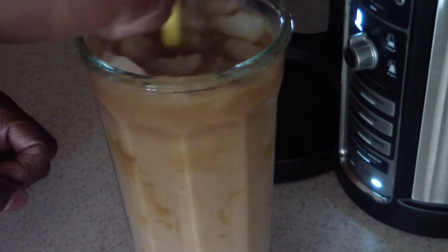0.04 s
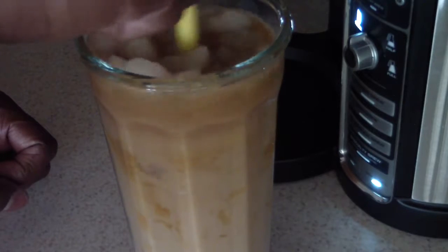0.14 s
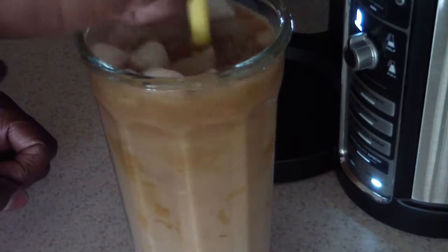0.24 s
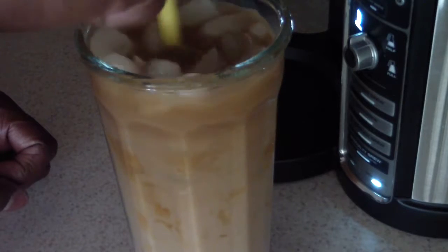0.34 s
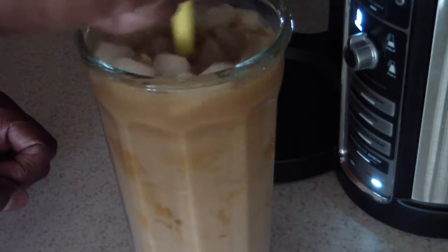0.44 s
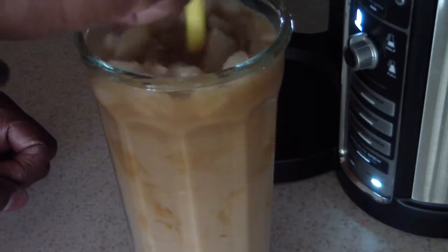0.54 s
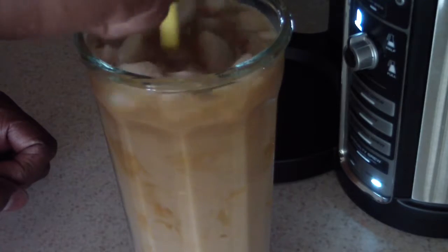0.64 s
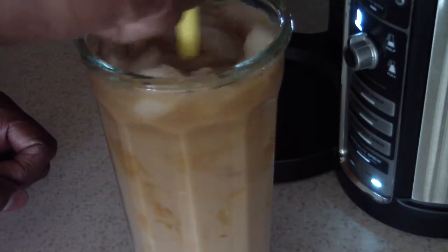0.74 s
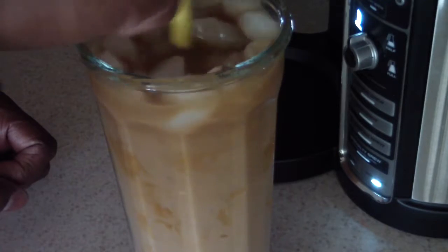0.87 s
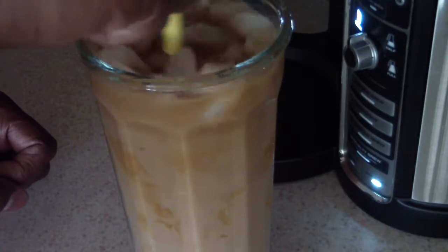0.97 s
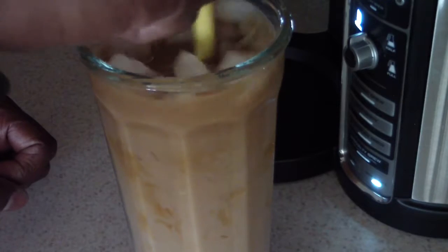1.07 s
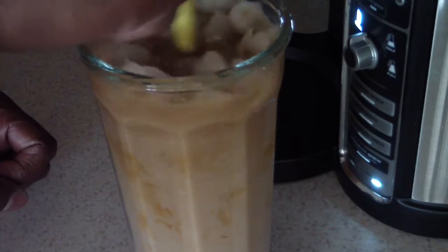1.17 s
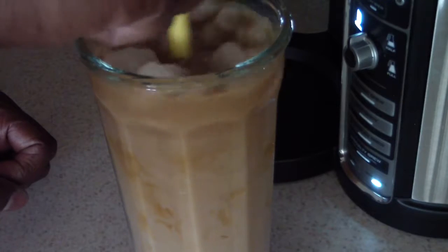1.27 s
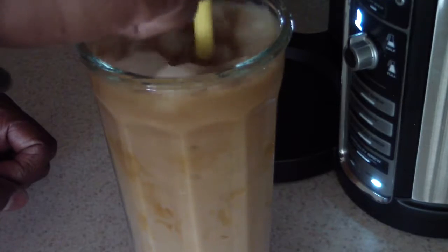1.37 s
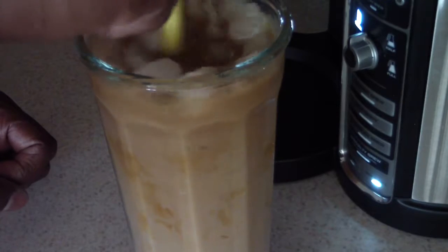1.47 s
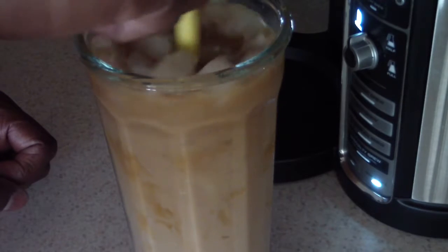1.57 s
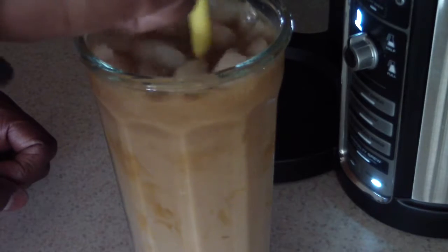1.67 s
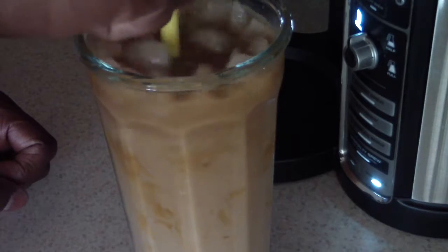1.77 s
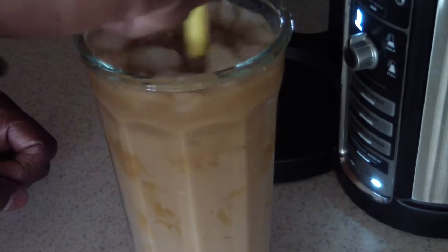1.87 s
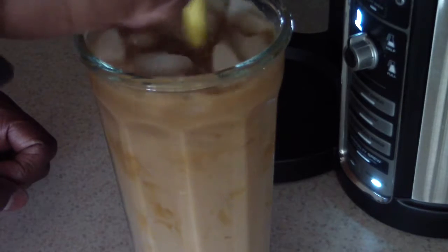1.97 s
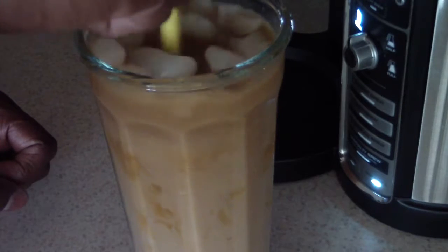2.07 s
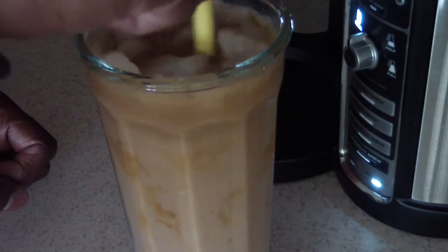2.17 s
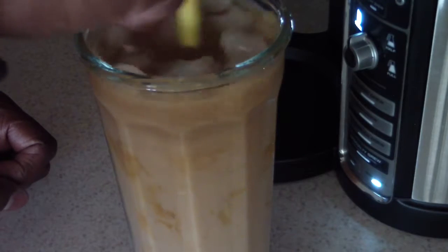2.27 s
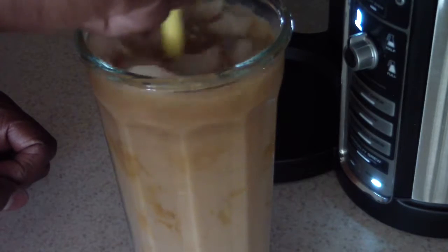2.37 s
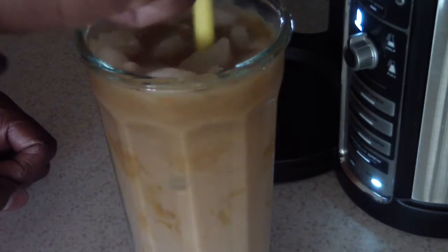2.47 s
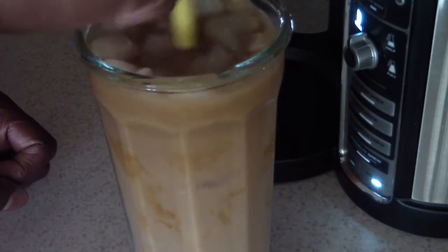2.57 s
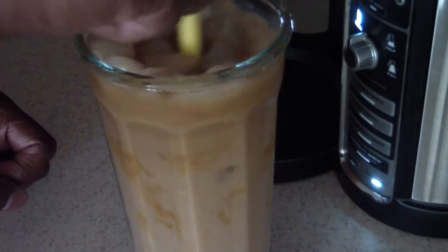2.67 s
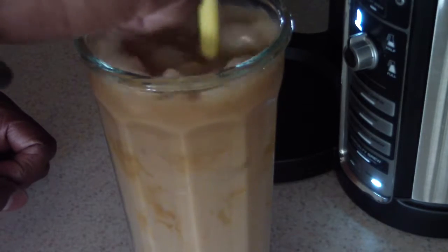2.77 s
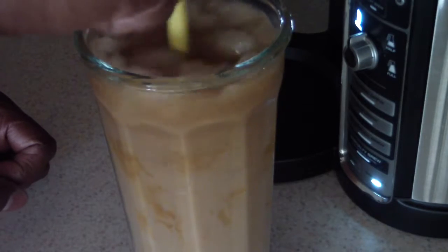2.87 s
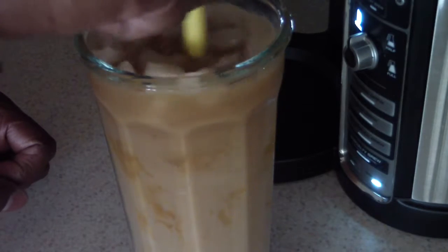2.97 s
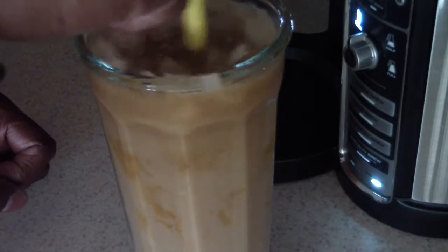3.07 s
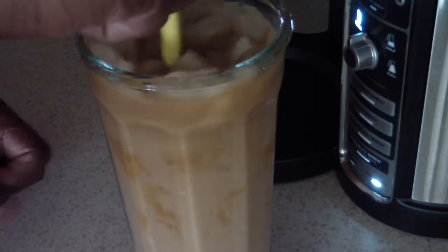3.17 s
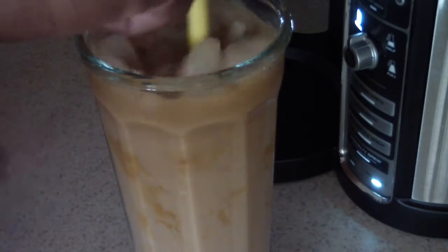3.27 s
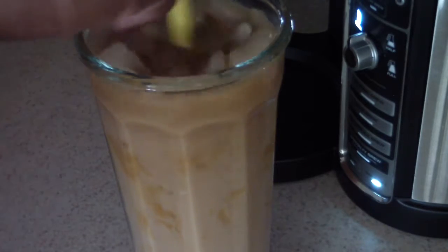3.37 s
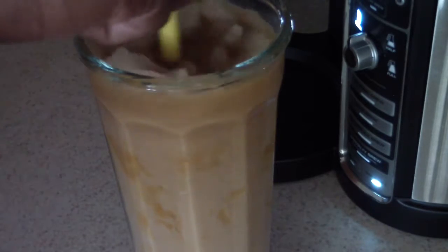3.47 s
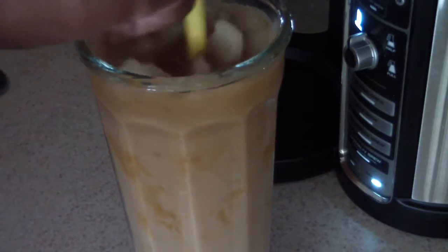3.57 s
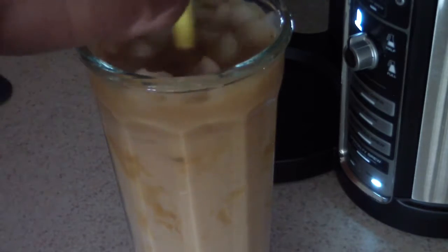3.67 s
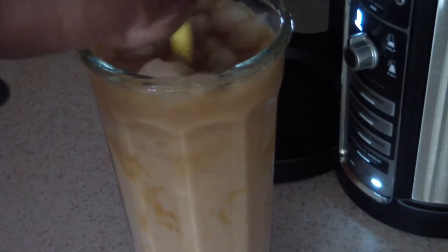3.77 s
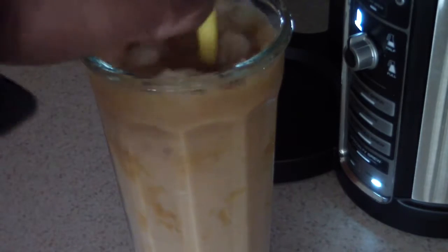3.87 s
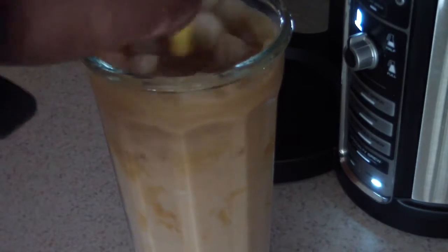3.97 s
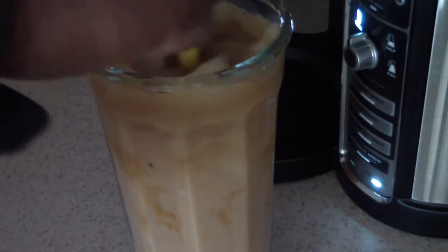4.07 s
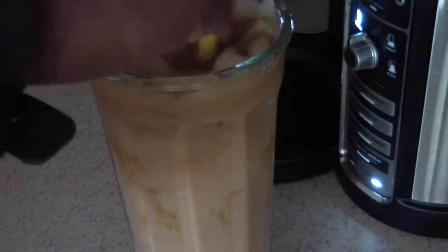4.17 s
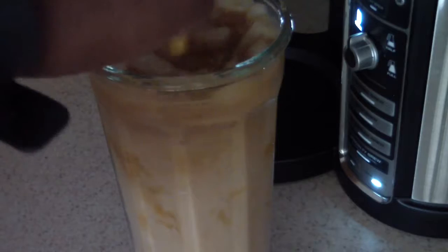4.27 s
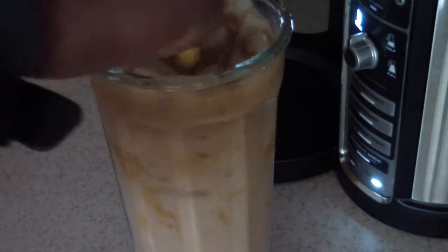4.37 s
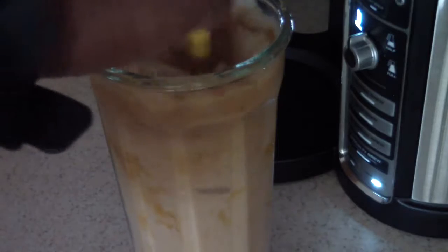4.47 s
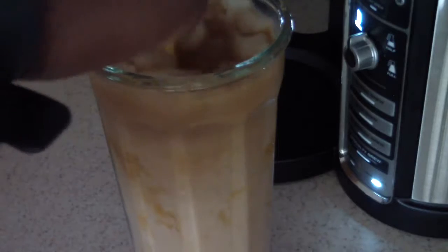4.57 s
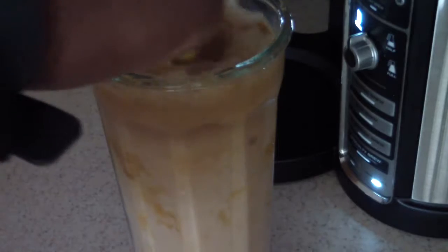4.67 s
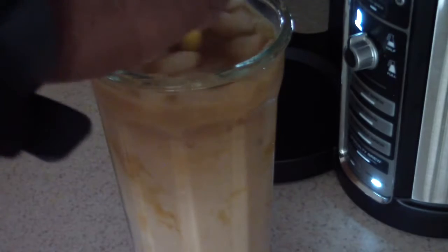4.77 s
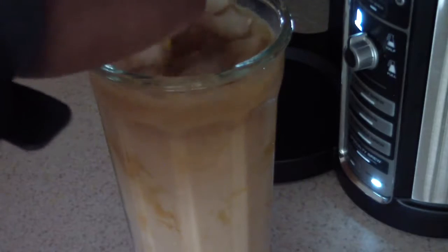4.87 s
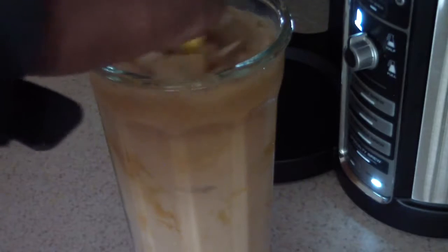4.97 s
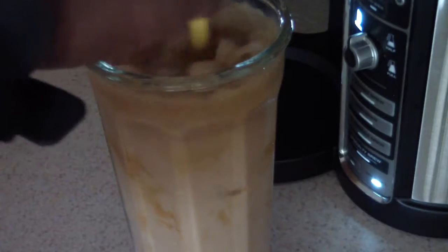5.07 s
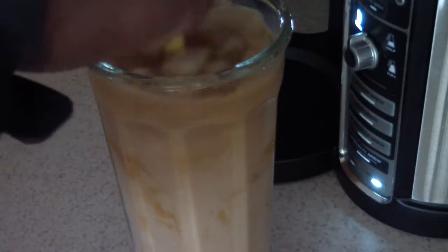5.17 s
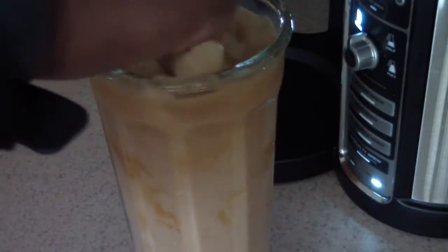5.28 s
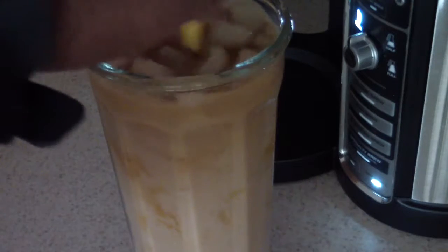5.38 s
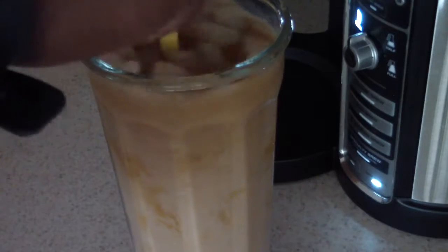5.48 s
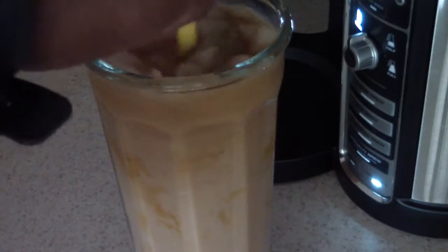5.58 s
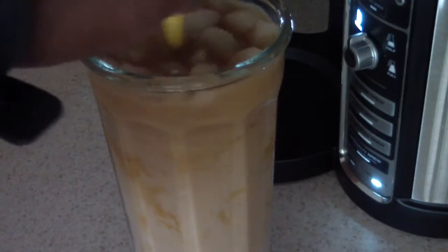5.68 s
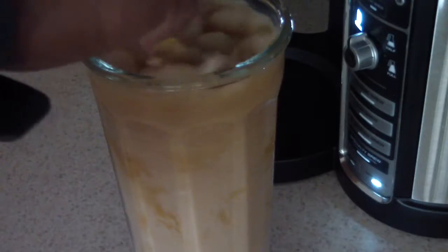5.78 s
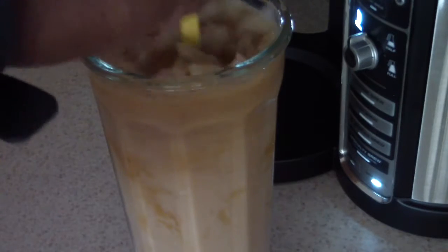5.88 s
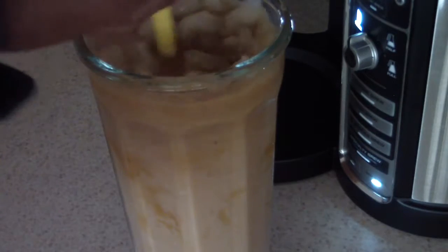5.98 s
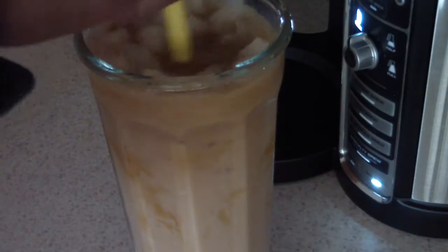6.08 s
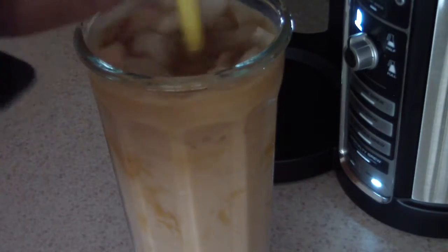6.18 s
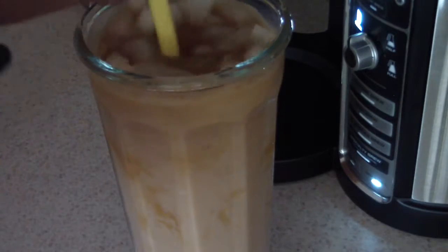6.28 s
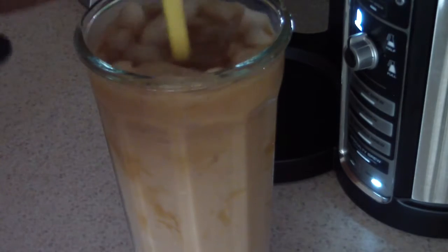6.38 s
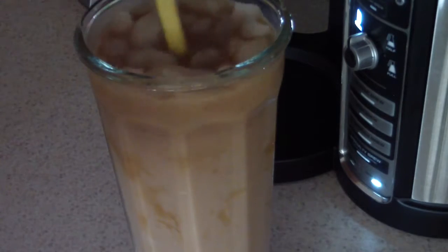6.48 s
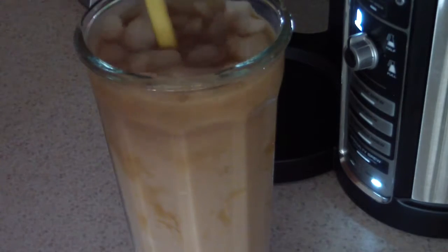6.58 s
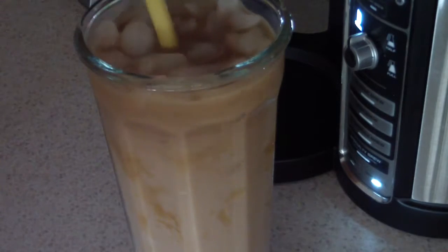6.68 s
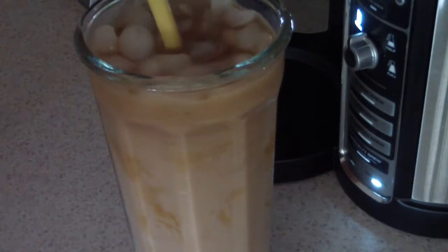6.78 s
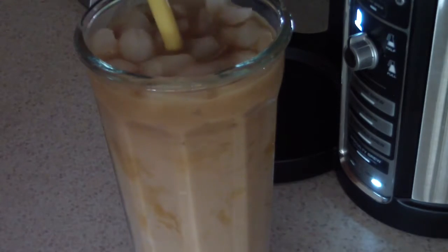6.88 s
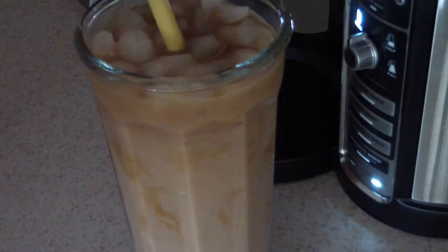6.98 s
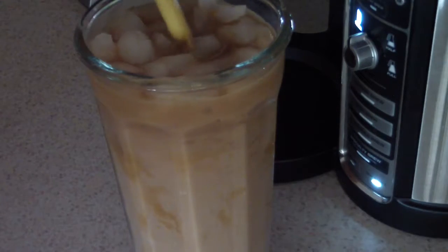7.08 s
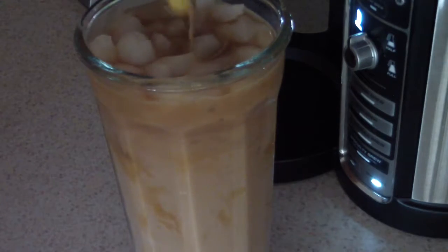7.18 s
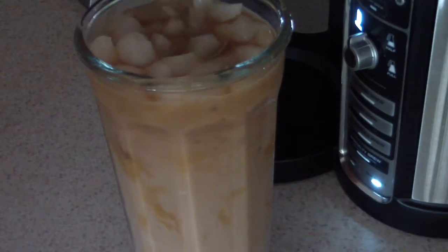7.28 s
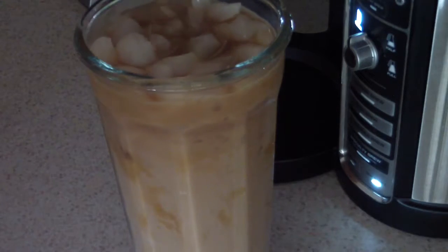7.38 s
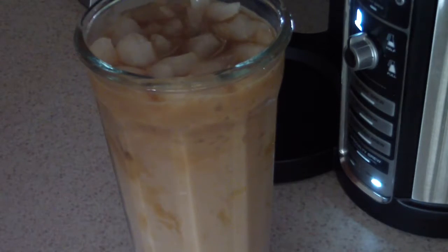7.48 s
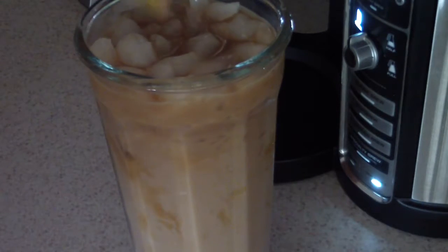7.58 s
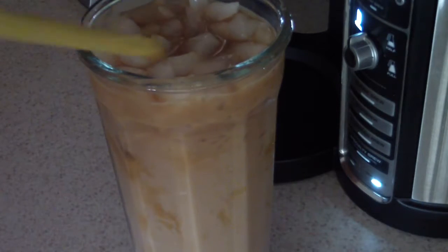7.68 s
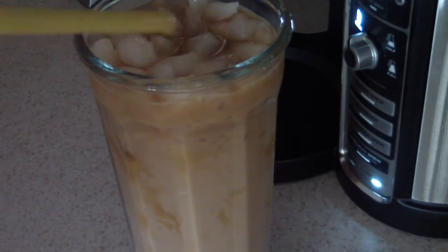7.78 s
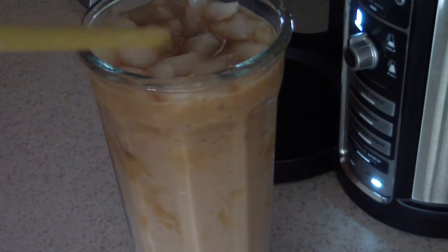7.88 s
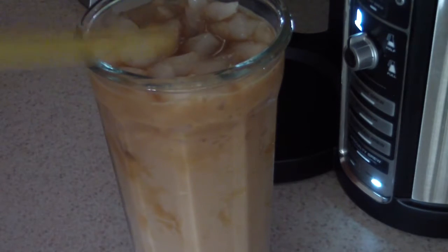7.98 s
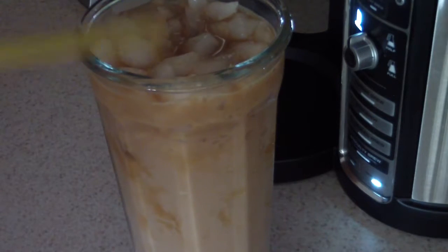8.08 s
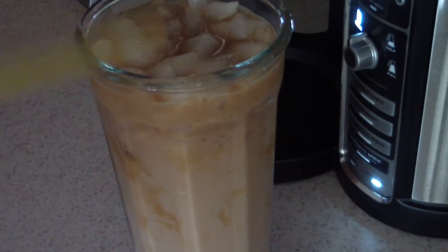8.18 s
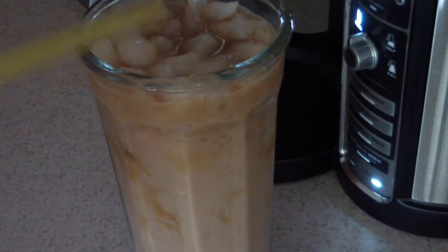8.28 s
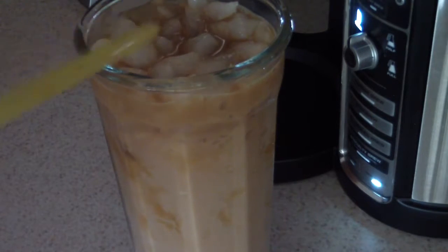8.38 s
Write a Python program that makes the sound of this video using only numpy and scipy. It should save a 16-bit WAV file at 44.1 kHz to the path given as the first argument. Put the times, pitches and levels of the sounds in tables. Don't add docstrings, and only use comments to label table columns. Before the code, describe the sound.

Fast, bright ice clatter in a full glass with wet gurgles and soft base thuds, ending in quiet ticks and a few light rim taps.

```python
import sys
import numpy as np
from scipy import signal
from scipy.fft import rfft, irfft
from scipy.io import wavfile

SR = 44100
rng = np.random.default_rng(int(sys.argv[2]) if len(sys.argv) > 2 else 0)


def attenuation_scalar(level_db):
    decades = np.asarray(level_db, float) / 20
    return 10 ** decades


def transcribe(signal):
    frames = np.atleast_2d(signal).T
    limited = np.clip(frames, -1, 1)
    pcm = np.round(limited * 32767).astype(np.int16)
    wavfile.write(sys.argv[1], SR, pcm)


N = 372204


def rms_one(x):
    return x / np.sqrt(np.mean(x ** 2) + 1e-20)


def at_hz(points, hz):
    table_hz, table_db = np.transpose(points)
    return np.interp(np.log(hz), np.log(table_hz + 1), table_db)


def colour(x, points):
    hz = np.arange(N // 2 + 1) * SR / N + 1
    return irfft(rfft(x) * attenuation_scalar(at_hz(points, hz)), N)


def drift(rate_hz):
    r = np.exp(-2 * np.pi * rate_hz / SR)
    noise = rng.standard_normal(N + SR)
    return rms_one(signal.lfilter([1], [1, -2 * r, r * r], noise)[SR:])


def ring(clicks, hz, t60):
    r, w = attenuation_scalar(-60 / (t60 * SR)), 2 * np.pi * hz / SR
    return signal.lfilter([0, np.sin(w)], [1, -2 * r * np.cos(w), r * r], clicks + 1e-18)


def sine(hz, t):
    return np.sin(2 * np.pi * hz * t)


def decay(t, t60):
    return attenuation_scalar(-60 * t / t60)


def swell(t, rise_s):
    return 1 - np.exp(-t / rise_s)


def filtered(x, order, hz, kind):
    return signal.sosfilt(signal.butter(order, hz, kind, fs=SR, output="sos"), x)


def add(out, s, sound):
    i = round(s * SR)
    out[i:i + len(sound)] += sound[:N - i]


# (start [s], length [s], strength [dB], brightness [dB])
PUSHES = [(-.03, 0.023, -1.5, 4), (0.082, 0.14, -3, 2), (0.28, 0.2, 1, 3), (0.528, 0.18, -1, 5.5),
          (0.804, .13, 0, 3), (0.985, 0.049, 1, 5.5), (1.136, 0.17, -1.5, -1), (1.471, 0.091, 3.5, 3),
          (1.705, 0.17, -2.5, 4), (1.941, 0.2, 2, 1), (2.223, 0.17, -1, 4.5), (2.483, 0.082, -6.5, 10),
          (2.612, 0.11, 2.5, 2), (2.819, 0.15, 0.5, 5), (3.109, 0.17, 1, 4.5), (3.396, 0.063, 3.5, 5.5),
          (3.595, 0.052, -10, 11), (3.72, 0.052, 3, 5), (3.941, 0.14, 1.5, 5.5), (4.169, 0.25, 0, 2.5),
          (4.483, 0.18, 0.5, 3), (4.745, 0.092, 1.5, -3), (4.9, 0.074, 7, 0.5), (5.044, 0.25, 2.5, -2.5),
          (5.358, 0.14, -0.7, 3.5), (5.723, 0.069, 5.5, 4.5), (5.864, 0.16, -2.5, 4),
          (6.144, 0.19, -1.5, 2), (6.409, 0.02, -1.5, -3), (6.532, 0.031, -12, -20)]


def stir():
    attack_s, release_db_per_s, settle_db_per_s = 0.028, 169, 110
    drift_db, stop_s = -4.5, 6.36
    trickle_db, trickle_end_s = -27, 6.95
    pause_s, pause_length_s, pause_db, pause_edge_s = 5.528, 0.12, -4, 0.0091
    t = np.arange(0, N, 32) / SR
    start, length, db, bright_db = np.transpose(PUSHES)[:, :, None]
    onset = np.clip((t - start) / attack_s + .5, 0, 1)
    release_db = release_db_per_s * np.maximum(t - start - length, 0)
    pushes = (onset * attenuation_scalar(db - release_db)) ** 2
    rest = attenuation_scalar(drift_db - settle_db_per_s * np.maximum(t - stop_s, 0)) ** 2
    rest += attenuation_scalar(trickle_db - settle_db_per_s * np.maximum(t - trickle_end_s, 0)) ** 2 + 1e-12
    power = pushes.sum(axis=0) + rest
    from_middle = abs(t - pause_s - pause_length_s / 2)
    slack_db = pause_db * np.clip((pause_length_s / 2 - from_middle) / pause_edge_s, 0, 1)
    effort_db = 10 * np.log10(power) + slack_db
    brightness_db = (pushes * bright_db).sum(axis=0) / power
    return [np.interp(np.arange(N) / SR, t, c) for c in (effort_db, brightness_db)]


def contacts(per_s, spread_db, clump_db):
    sizes = attenuation_scalar(spread_db * np.minimum(rng.exponential(1, N), 3.6)) * rng.choice([-1, 1], N)
    chance = per_s * attenuation_scalar(clump_db * drift(25)) / SR
    return rms_one(sizes * (rng.random(N) < chance))


def ice(spectrum, per_s, cycles, spread_db, count):
    clicks, dealt, out = contacts(per_s, spread_db, clump_db=4.5), rng.integers(0, count, N), 0
    top_hz = min(spectrum[-1][0], .37 * SR)
    for k, hz in enumerate(np.geomspace(spectrum[1][0], top_hz, count)):
        r = attenuation_scalar(-60 * hz / cycles / SR)
        poles = [1, -2 * r * np.cos(2 * np.pi * hz / SR), r * r]
        piece = signal.lfilter([1], np.convolve(poles, poles), clicks * (dealt == k) + 1e-18)
        out = out + attenuation_scalar(at_hz(spectrum, hz)) * np.sqrt(hz) * rms_one(piece)
    return rms_one(out)


# (frequency [Hz], level [dB per Hz])
RATTLE = [(1000, -45), (1700, -4), (1830, -8), (2290, -6), (2560, -17), (2800, -19.5), (3010, 1.5),
          (3630, 0), (4270, -7.5), (5220, -4.5), (6090, -9.5), (6940, -54), (8000, -4), (10400, -16.5),
          (17600, -120)]


def rattle(effort_db):
    return attenuation_scalar(-33 + effort_db) * ice(RATTLE, 2600, cycles=17.2, spread_db=2.5, count=26)


# (frequency [Hz], level [dB per Hz])
CRACKLE = [(3530, 16.5), (6000, 10.5), (6930, -1), (8330, 6.5), (12200, 3), (15100, -16), (16500, -8)]


def crackle(effort_db, bright_db):
    level_db = -34 + 0.86 * effort_db + bright_db
    return attenuation_scalar(level_db) * ice(CRACKLE, 4000, cycles=3.2, spread_db=2.5, count=12)


def ice_noise(t, count):
    grit = rng.standard_normal((count, len(t)))
    return grit, filtered(grit, 2, [6500, 14500], "band")


def snap(t):
    return decay(t, .008) * swell(t, .0003)


# (time [s], peak [dB], pitch [Hz])
CLINKS = [(0.117, -18, 4200), (0.1999, -26, 3110), (0.2752, -5, 3330), (0.309, -30, 3100),
          (0.3336, -15, 3390), (0.373, -18, 3170), (0.3895, -10, 3700), (0.4414, -13, 3050),
          (0.4545, -6, 3980), (0.5217, -13, 3060), (0.5611, -9, 5210), (0.611, -7.5, 3140),
          (0.6549, -17, 4040), (0.6814, -7, 3650), (0.7421, -13, 3960), (0.7896, -17, 3690),
          (0.82, -14, 3570), (0.838, -7.5, 3140), (0.9176, -10.5, 3060), (0.962, -18, 4400),
          (1.0061, -15, 3620), (1.036, -14, 3130), (1.255, -14, 3650), (1.3269, -18, 3660),
          (1.3625, -16, 3350), (1.4247, -13.5, 3640), (1.4416, -12, 3100), (1.4666, -18, 3600),
          (1.489, -12, 3330), (1.524, -21, 3400), (1.5474, -5.5, 3640), (1.6792, -12.5, 3520),
          (1.708, -23, 3060), (1.7639, -23, 3730), (1.7835, -29, 3020), (1.8357, -24, 3530),
          (1.864, -10, 3440), (1.915, -17, 3030), (1.955, -16, 3040), (1.9934, -3.5, 3540),
          (2.0639, -3, 3320), (2.1296, -24, 3550), (2.1787, -12, 3570), (2.2357, -5.5, 3530),
          (2.2668, -15, 3120), (2.3028, -4.5, 3540), (2.3477, -12.5, 3110), (2.465, -18, 4240),
          (2.5067, -15, 3780), (2.606, -14, 5090), (2.6337, -2.5, 3140), (2.7237, -15, 3670),
          (2.795, -14.5, 3060), (2.8384, -24, 3440), (2.8843, -13, 5660), (2.8983, -4, 3830),
          (2.9617, -15, 3740), (2.9918, -10.5, 3100), (3.0613, -19, 5200), (3.1415, -10, 3750),
          (3.2607, -16, 3700), (3.3724, -13.5, 3640), (3.3974, -13, 3570), (3.4443, -13, 3540),
               (3.5995, -38, 5110), (3.646, -14, 3900), (3.688, -19, 3020), (3.7211, -10, 5500),
               (3.74, -8, 5600), (3.7713, -10, 3280), (3.8527, -13.5, 3640), (3.963, -23, 3230),
               (3.987, -20, 3780), (4.0065, -16, 4600), (4.0276, -7, 3930), (4.0796, -3.5, 3730),
               (4.1836, -17, 3240), (4.232, -7, 3520), (4.2918, -25, 5560), (4.3153, -14, 3500),
               (4.3468, -4, 6060), (4.386, -13, 5700), (4.424, -16, 3080), (4.4934, -20, 3270),
               (4.53, -5, 3280), (4.5687, -20, 3570), (4.6126, -9, 3370), (4.6404, -10, 4150),
               (4.7055, -14, 3000), (4.7837, -15, 3660), (4.826, -14, 3640), (4.8551, -18, 3740),
               (4.874, -12.5, 3970), (4.922, -15, 3730), (4.9374, -8, 3650), (4.9604, -8.5, 3000),
               (4.998, -12.5, 3040), (5.08, -11.5, 3630), (5.1279, -29, 3500), (5.1865, -9, 3400),
               (5.243, -10, 3060), (5.282, -18, 3040), (5.374, -9, 3100), (5.4667, -24, 3560),
               (5.4856, -13, 6230), (5.6059, -22, 3380), (5.6953, -25, 5200), (5.7341, -29, 3600),
               (5.762, -8, 4500), (5.779, -8, 6220), (5.8916, -21, 3150), (5.9356, -17, 3640),
               (5.9782, -15, 3100), (6.017, -14, 3700), (6.0834, -17, 3100), (6.158, -14, 3090),
               (6.214, -15, 3500), (6.2387, -7.5, 3340), (6.2858, -15.5, 2890), (6.3187, -18, 3030),
          (6.4203, -20, 2480), (6.4396, -14, 3530), (6.4963, -22, 3100), (6.5151, -32, 3600),
            (6.5381, -33, 1750), (6.5561, -30, 4800), (6.5734, -23, 3050), (6.5971, -38, 3500),
            (6.6351, -37, 3040), (6.6931, -35, 2900), (6.8094, -37, 1750), (6.8501, -41, 3080),
            (6.8668, -37, 1670), (8, -41, 4600), (6.9451, -42, 3400), (7.0001, -38, 1700),
            (7.4171, -36, 4210), (7.4201, -33, 1690), (8.0641, -41, 3500),
          (0.2769, -8, 3370), (0.5754, -24, 3640), (0.69, -9, 3580), (0.929, -19, 3300),
            (1.2294, -17, 3040), (2.6264, -8, 3000), (2.6426, -2.5, 3560), (2.6597, -16, 3000),
            (2.675, -16, 3100), (2.9105, -9, 3500), (3.1926, -13, 4020), (3.4294, -20, 6000),
            (4.04, -11, 3900), (4.5024, -15, 3360), (4.619, -11, 4870), (4.8823, -13, 3960),
            (5.4994, -10, 3450), (5.751, -18, 4490), (5.8, -14, 3880), (5.819, -21, 3260),
            (6.2994, -12, 3560), (6.426, -17.5, 4180), (6.4536, -29, 3100)]


def clinks():
    rows = np.array(CLINKS)
    out, t = np.zeros(N), np.arange(900) / SR
    luck = rng.random((len(rows), 8))
    grit, bright = ice_noise(t, len(rows))
    course = decay(t, .014) * swell(t, .0003)
    for (s, db, hz), u, noise, crack in zip(rows, luck, grit, bright * snap(t)):
        overtones = sum(0.58 * sine(2900 * 2 ** (1.121 * v), t) for v in u[:2])
        touch = attenuation_scalar(db - 6.0) * (sine(hz, t) + overtones + 0.47 * noise) * course
        add(out, s + .0007, touch + attenuation_scalar(db - 19) * crack)
        add(out, s + .002 + 0.002 * u[2], 1.18 * u[3] * touch)
        add(out, s + 0.0035 + 0.0091 * u[4], -.45 * u[5] * touch)
    return out, rows


# (time [s], peak [dB], pitch [Hz])
CRACKS = [(0.2359, -18, 8750), (0.274, -13, 8340), (0.5202, -26, 8170), (0.535, -15, 10400),
          (0.5617, -6.5, 10350), (0.6654, -13, 8690), (0.7416, -12, 8750), (0.7861, -28, 8200),
          (0.8045, -15, 8300), (1.1055, -15, 7640), (1.1558, -20, 7600), (1.2096, -13, 8300),
          (1.48, -17, 8050), (1.5269, -14, 7400), (1.6526, -23, 8450), (1.6785, -16, 9300),
          (1.871, -10.5, 13000), (2.029, -11, 6100), (2.1133, -13, 10700), (2.2347, -16, 7360),
          (2.3506, -14, 8580), (2.606, -27, 7520), (2.6324, -11, 8030), (2.821, -19, 11800),
          (2.8395, -7, 10500), (2.9442, -17, 11900), (2.9624, -12, 8470), (2.9816, -19, 8300),
          (3.06, -15, 8550), (3.132, -11, 7180), (3.1941, -12, 7800), (3.2326, -23, 9180),
          (3.383, -19, 7280), (3.3979, -12, 8960), (3.5997, -23, 7690), (3.72, -13, 7130),
          (3.95, -18, 9040), (3.9786, -18, 8280), (3.9953, -22, 8270), (4.027, -6.5, 8360),
          (4.04, -8, 11500), (4.185, -13.5, 8170), (4.3446, -12, 7550), (4.4948, -12, 7540),
          (4.5694, -16, 8250), (4.7212, -8, 9900), (4.7835, -10, 8750), (4.8813, -18, 9190),
          (5.2544, -7, 9700), (5.3797, -9, 8300), (5.5538, -23, 9000), (5.6487, -22, 10900),
          (5.7344, -15, 8500), (5.7743, -21, 9120), (5.793, -11, 9400), (5.861, -13.5, 9000),
          (5.9389, -18, 7200), (6.1579, -18, 8340), (6.2871, -13.5, 8170), (6.415, -14, 11000)]


def cracks():
    out, t = np.zeros(N), np.arange(900) / SR
    _, bright = ice_noise(t, len(CRACKS))
    for (s, db, hz), crack in zip(CRACKS, bright):
        pitched = rms_one(ring(crack, hz, 0.0035))
        add(out, s + .0005, attenuation_scalar(db + 5.5) * (0.7 * crack + 0.45 * pitched) * snap(t))
    return out


# (frequency [Hz], level [dB], t60 [s])
GLASS = [(1405, -4.5, 0.09), (1417, -6, 0.12), (1648, -5.5, 0.038), (2030, -16.5, 0.04), (2260, -14, 0.033),
         (3040, -2.5, 0.04), (3640, -2, 0.034), (5130, -8.5, .025)]
# (time [s], peak [dB])
WALL_HITS = [(0.0942, -46), (0.1261, -28), (0.2783, -39), (0.425, -24), (0.5571, -25), (0.6045, -22.5),
             (0.6823, -25), (0.8425, -26), (0.8884, -35), (0.9268, -23.5), (0.9961, -29), (1.045, -24),
             (1.165, -30), (1.4267, -31), (1.5075, -46), (1.5499, -24), (1.7165, -28), (1.7893, -20.5),
             (1.9165, -31), (1.9945, -23), (2.006, -18.5), (2.3042, -41), (2.4264, -30), (2.4713, -26.5),
             (2.5476, -29), (2.6174, -23.5), (2.6614, -24), (2.6918, -43), (2.7247, -24), (2.8464, -28),
             (2.8963, -21.5), (3.135, -27), (3.1787, -21.5), (3.242, -25), (3.4221, -38), (3.6157, -37),
             (3.69, -32), (3.7424, -20), (3.8556, -28), (3.9489, -29), (3.988, -33), (4.0277, -22),
             (4.0786, -25.5), (4.232, -27), (4.3859, -42), (4.5331, -26), (4.7481, -34), (4.787, -26),
             (4.8549, -26), (4.9018, -35), (4.9382, -34), (5.0804, -23), (5.1996, -19), (5.3747, -43),
             (5.4874, -31), (5.601, -31), (5.746, -25), (5.7793, -23), (6.2003, -28), (6.3021, -35),
             (6.3335, -26), (6.4433, -37), (6.573, -40)]


def glass(effort_db, rows):
    rub_db = -37.5 + 1.24 * effort_db
    rub = attenuation_scalar(rub_db - 23.0) * contacts(500, spread_db=3.0, clump_db=3.5)
    at, out = np.round(rows[:, 0] * SR).astype(int), 0
    for hz, db, t60 in GLASS:
        clicks = rub * rng.standard_normal(N)
        clicks[at] += attenuation_scalar(rows[:, 1] - 23.5) * rng.standard_normal(len(at))
        for s, hit_db in WALL_HITS:
            clicks[round(s * SR)] += attenuation_scalar(hit_db - 2.0)
        out = out + attenuation_scalar(db) * ring(clicks, hz, t60)
    return out


def slosh(effort_db):
    clicks, dealt = contacts(300, spread_db=2.0, clump_db=4.0), rng.integers(0, 12, N)
    small = sum(ring(clicks * (dealt == k), hz, 12.0 / hz) for k, hz in enumerate(np.geomspace(600, 1300, 12)))
    cup = ring(clicks, 930, .06) + ring(clicks, 960, .05)
    low = ring(clicks, 346, 0.049)
    mix = 0.32 * rms_one(small) + .5 * rms_one(cup) + 0.16 * rms_one(low)
    return attenuation_scalar(-43 + 0.74 * effort_db) * mix


# (time [s], peak [dB], pitch [Hz])
GURGLES = [(0.128, -36, 1060), (0.69, -46, 925), (1.84, -31, 1190), (2.301, -28, 1000), (2.645, -21, 1130),
           (2.901, -20.5, 892), (3.236, -26, 1010), (3.425, -23, 1194), (3.742, -20.5, 1173),
           (3.836, -23, 812), (4.02, -22.5, 994), (4.198, -21.5, 930), (4.536, -19, 926),
           (4.78, -22.5, 950), (4.83, -31, 1020), (5.741, -26, 900), (5.882, -22, 956), (5.94, -23, 966),
           (6.019, -24, 920), (6.06, -40, 940), (6.155, -25, 912), (6.223, -20.5, 960), (6.301, -23, 970),
           (6.428, -25.5, 724), (6.588, -22.5, 655), (6.69, -37, 610)]


def gurgles():
    out, t = np.zeros(N), np.arange(4000) / SR
    for s, db, hz in GURGLES:
        bubble = sine(hz, t + 0.87 * t * t) * decay(t, 0.095) * swell(t, 0.0012)
        add(out, s, attenuation_scalar(db - 7.0) * bubble)
    return out


# (time [s], peak [dB], pitch [Hz], upper modes [dB])
THUDS = [(0.076, -33, 102, -56), (0.304, -46, 91, -60), (0.475, -40, 112, -58), (0.689, -33, 106, -50.5),
         (0.928, -28.5, 97, -50), (1.031, -36, 97, -54), (1.224, -24, 94, -44.5), (1.32, -36, 94, -53),
         (1.522, -27, 110, -45.5), (1.811, -37.5, 110, -47), (2.096, -38, 101, -50),
         (2.369, -28.5, 106, -46), (2.665, -32, 104, -44), (2.949, -31, 103, -49.5),
         (3.172, -25.5, 95, -42.5), (3.452, -24.5, 93.5, -41), (3.749, -45, 99, -50), (4.06, -42, 107, -51),
         (4.656, -30, 101, -46), (4.83, -36.5, 90, -71), (5.051, -47, 102, -74), (5.269, -39, 110, -62)]


def thuds():
    out, t = np.zeros(N), np.arange(12000) / SR
    modes = [(189, 1.74, 0.045), (312, 0.74, 0.12), (383.0, 0.18, 0.29)]    # (Hz, gain, t60 s)
    upper = sum(g * sine(mode_hz, t) * decay(t, t60) for mode_hz, g, t60 in modes)
    fall = attenuation_scalar(-60 * t / 0.26 - 60 * (t / 0.16) ** 2) * (1 - 0.29 * np.exp(-t / 0.0076))
    for s, db, hz, upper_db in THUDS:
        cycles = hz * (0.8 * t + 0.18 * 0.037 * swell(t, 0.025))
        low = -np.sin(2 * np.pi * cycles) * fall + 0.12 * sine(150, t) * decay(t, 0.41)
        knock = attenuation_scalar(db + 7.0) * low + attenuation_scalar(upper_db + 14.5) * upper
        add(out, s + 0.0019, knock * swell(t, 0.0046))
    return out


# (frequency [Hz], t60 [s])
SPOON = [(1240, .036), (1900, .032)]
# (time [s], tick [dB], low knock [dB], high knock [dB])
TAPS = [
    (6.999, -48, -60, -59),
    (7.042, -28, -65, -65),
    (7.6907, -25, -39.5, -38),
    (7.8574, -39, -57, -66),
    (8.016, -47, -48, -57),
    (8.0278, -30, -52, -60),
    (8.0374, -18, -47, -50),
    (8.0843, -19, -38, -37.5),
]


def taps():
    out, t = np.zeros(N), np.arange(3000) / SR
    luck = rng.standard_normal((len(TAPS), len(t)))
    for (s, db, *knock_db), noise in zip(TAPS, luck):
        tick = rms_one(ring(noise, 8700, 0.00059)) * (.5 * decay(t, 0.0036) + 0.089 * decay(t, 0.031))
        knock = sum(attenuation_scalar(d + 4.0) * sine(hz, t) * decay(t, t60) for (hz, t60), d in zip(SPOON, knock_db))
        knock += attenuation_scalar(knock_db[1] - 3.0) * sine(1500, t) * decay(t, 0.037)
        add(out, s + 0.001094, attenuation_scalar(db) * tick + knock)
    return filtered(out, 2, 900, "high")


def echoes(x, t60, gap_s, turns_per_s=5.0, count=3):
    t, turn, out = np.arange(SR // 6) / SR, np.arange(N) / SR * turns_per_s, 0
    for k in range(count):
        tail = rng.standard_normal(len(t)) * decay(t, t60) * (t > gap_s)
        share = np.maximum(1 - np.abs((turn - k) % count - 1), 0)
        out = out + signal.oaconvolve(x * np.sqrt(share), tail / np.sqrt(np.sum(tail ** 2)))[:N]
    return out


def kitchen(drink):
    return attenuation_scalar(-7) * echoes(filtered(drink, 1, 6000, "low"), .16, gap_s=0.0019)


# (frequency [Hz], side minus mid [dB])
GLASS_SIDE = [(100, -29), (500, -16), (1400, -78), (3000, -17), (5500, -13), (7500, -7), (10500, -12.5),
              (14000, -12.5)]


def counter_width(mid):
    return colour(echoes(mid, 0.021, gap_s=.0001, turns_per_s=23.0), GLASS_SIDE)


# (frequency [Hz], level [dB per Hz])
AIR = [(26, -11), (45, -1.5), (60, -9), (123, -2.5), (150, -10.5), (260, -17), (421, -17), (948, -23.5),
       (7650, -30), (17000, -33)]
# (frequency [Hz], side minus mid [dB])
AIR_SIDE = [(60, -5), (110, -8.5), (200, -2), (380, -3.5), (700, -2.5), (1290, -2), (2380, -1.5),
            (4400, -2), (8120, -2), (15000, -1)]
# (time [s], level [dB])
RUMBLE = [
    (0.0, -67),
    (1.27, -39),
    (1.57, -73),
    (4.51, -73),
    (5.38, -44.5),
    (8.44, -50),
]


def room_air():
    air_db = -47.5
    mid = attenuation_scalar(air_db) * rms_one(colour(rng.standard_normal(N), AIR))
    side = attenuation_scalar(air_db) * colour(rms_one(colour(rng.standard_normal(N), AIR)), AIR_SIDE)
    hum = attenuation_scalar(-56.5) * rms_one(ring(rng.standard_normal(N), 119.5, 1.0))
    rumble_db = np.interp(np.arange(N) / SR, *np.transpose(RUMBLE)) - 8.0
    rumble = attenuation_scalar(rumble_db) * rms_one(ring(rng.standard_normal(N), 26.0, 0.15))
    return mid + hum + rumble + side * [[1], [-1]]


def scene():
    effort_db, bright_db = stir()
    clinking, rows = clinks()
    rim, rim_wet = taps(), .5
    hard = rattle(effort_db) + crackle(effort_db, bright_db)
    hard += clinking + cracks() + glass(effort_db, rows)
    hard = filtered(hard, 4, 800, "high")
    drink = hard + slosh(effort_db) + gurgles() + rim_wet * rim
    mid = drink + kitchen(drink) + thuds() + (1 - rim_wet) * rim
    return mid * attenuation_scalar([[-.6], [.6]]) + counter_width(mid) * [[1], [-1]] + room_air()


# (frequency [Hz], side minus mid [dB])
MASKED = [(300, -41), (900, -19.5), (1500, -12.5), (5000, -11), (9000, -13), (16000, -13)]


def joint_stereo(pair):
    window = np.sin(np.pi * (np.arange(2048) + .5) / 2048)
    lead = np.zeros((2, 567))
    centre, difference = (pair[0] + pair[1]) / 2, (pair[0] - pair[1]) / 2
    padded = np.hstack([lead, [centre, difference]])
    hz, _, (mid, side) = signal.stft(padded, SR, window, 2048, 1024)
    edges = np.unique(np.r_[np.geomspace(4, 160, 30), np.arange(160, 1025, 16)].astype(int))
    for low, high in zip(edges, edges[1:]):
        side_power = np.sum(abs(side[low:high]) ** 2, axis=0)
        mid_power = np.sum(abs(mid[low:high]) ** 2 + 1e-20, axis=0)
        side[low:high] *= side_power / mid_power > attenuation_scalar(2 * at_hz(MASKED, hz[low]))
    side = signal.istft(side, SR, window, 2048, 1024)[1][567:567 + N]
    return centre + side * [[1], [-1]]


def top_cut(x):
    return signal.sosfilt(signal.butter(12, 16980, fs=SR, output="sos"), x)


def record(dry):
    low_pass = signal.ellip(12, .5, 70, 15780, fs=SR, output="sos")
    mix = joint_stereo(signal.sosfilt(low_pass, dry))
    return top_cut(mix)


dry = scene()
out = record(dry)
transcribe(out)
```